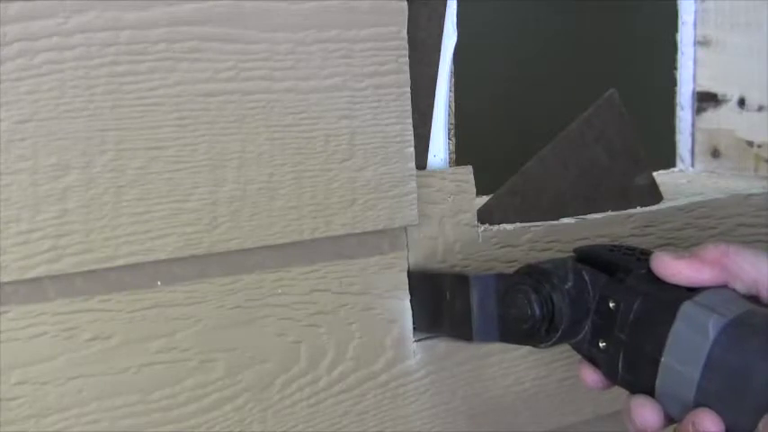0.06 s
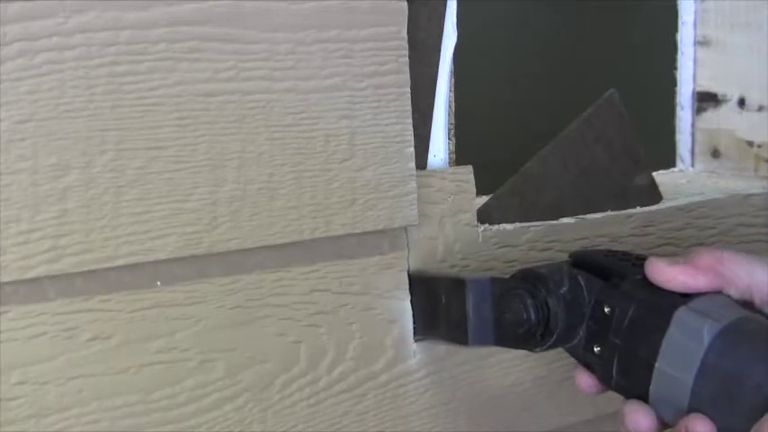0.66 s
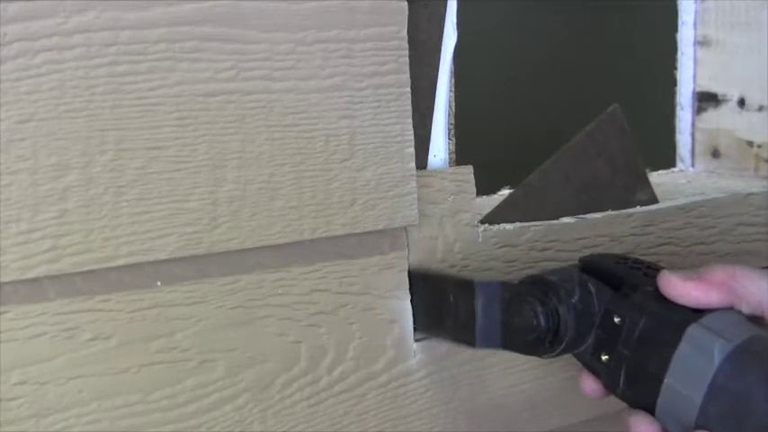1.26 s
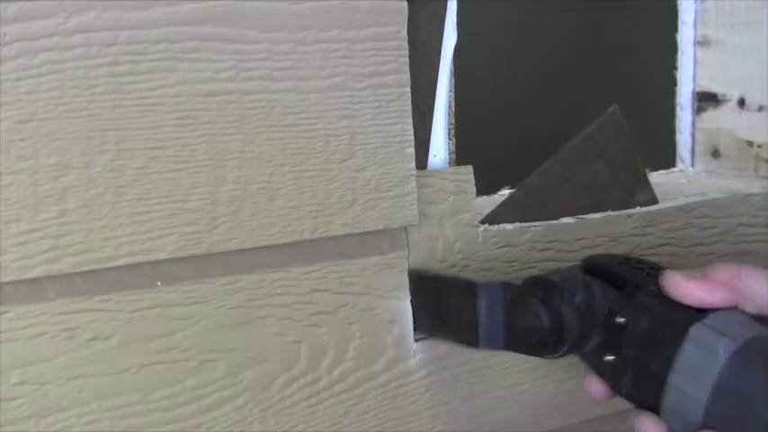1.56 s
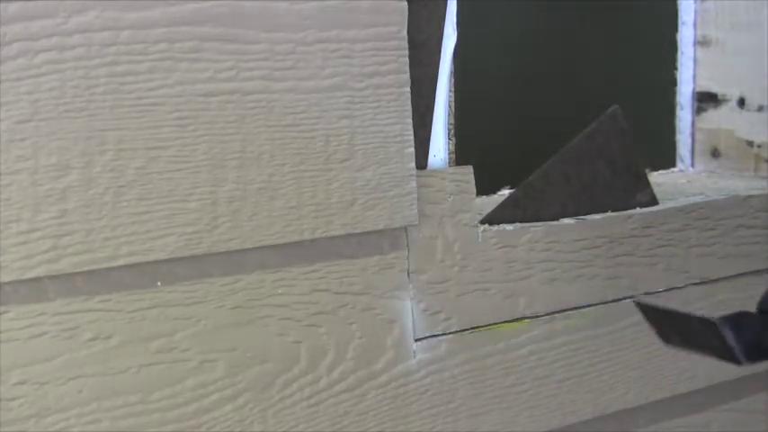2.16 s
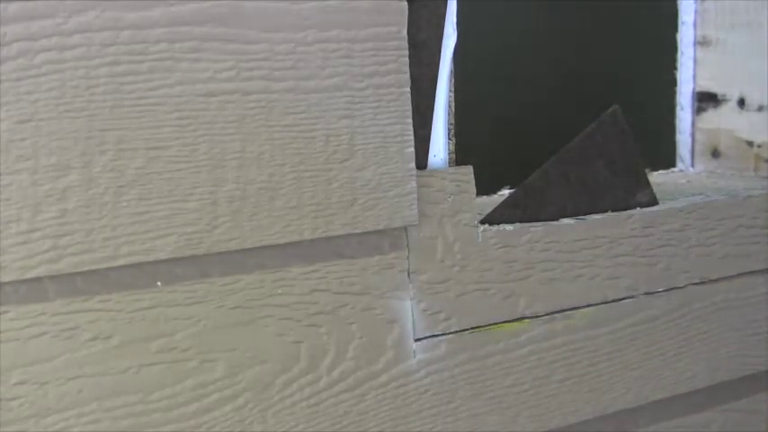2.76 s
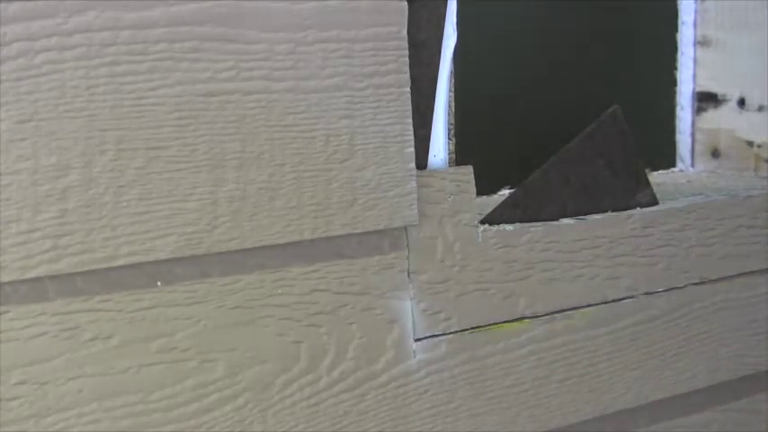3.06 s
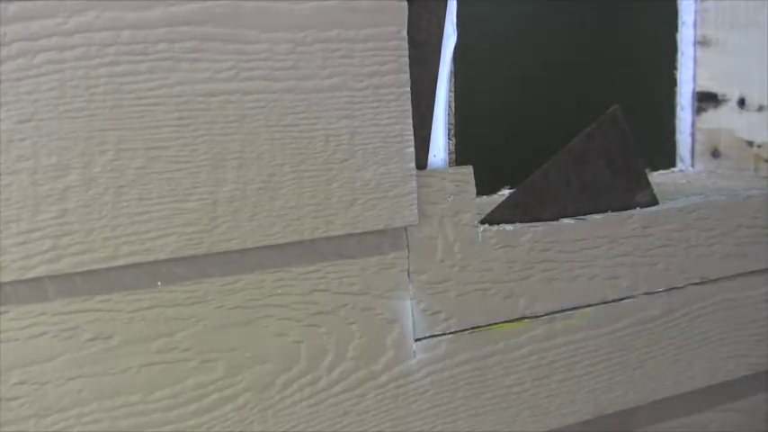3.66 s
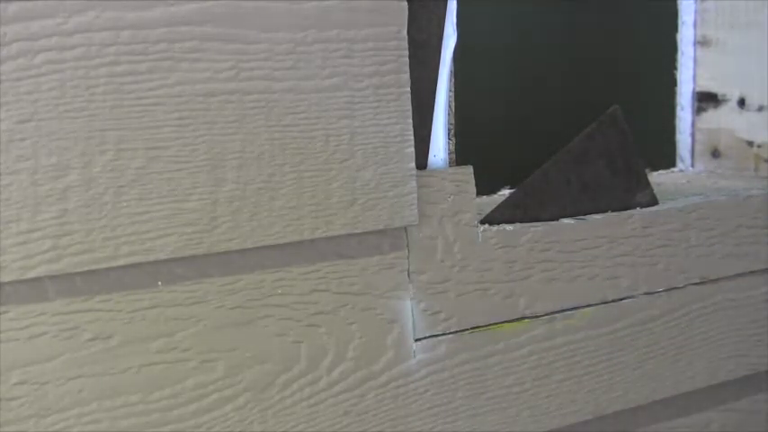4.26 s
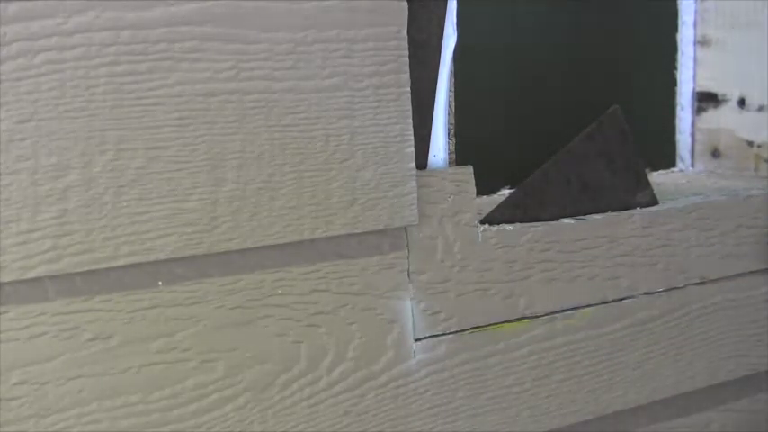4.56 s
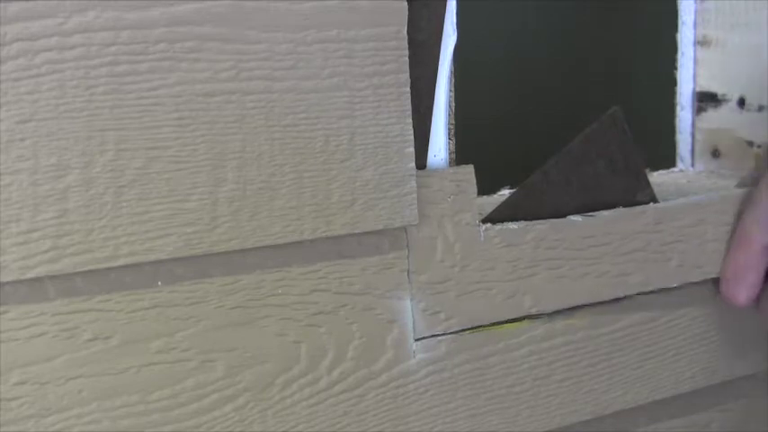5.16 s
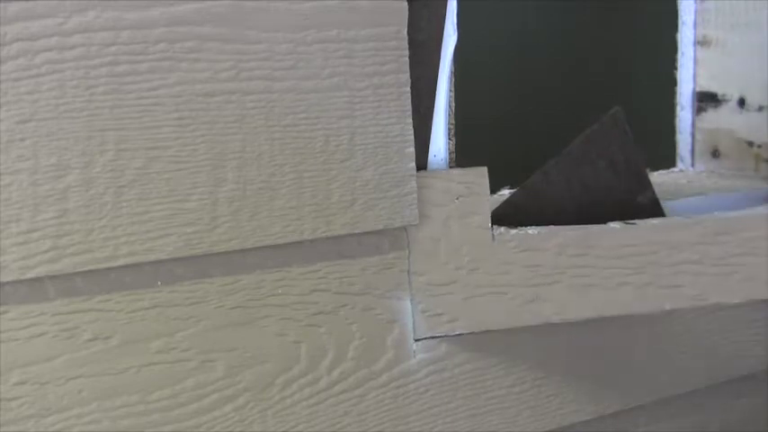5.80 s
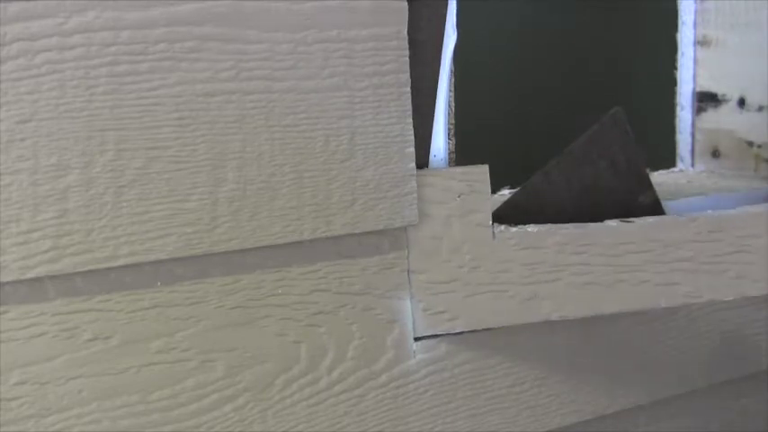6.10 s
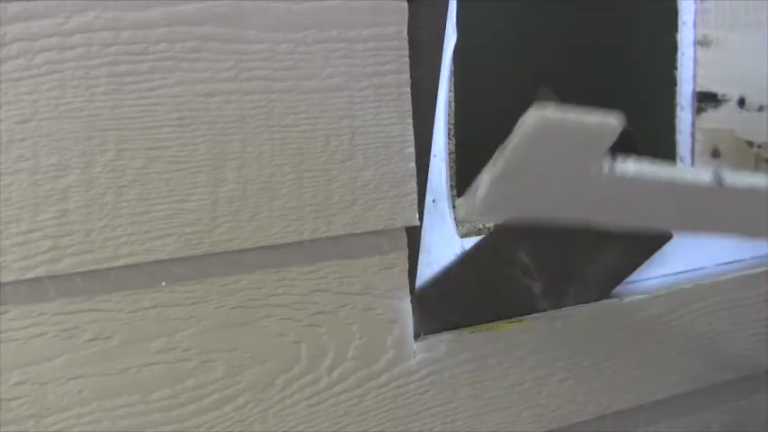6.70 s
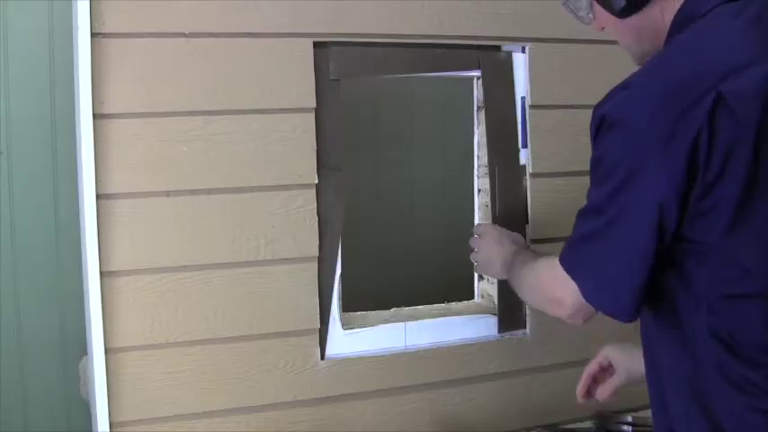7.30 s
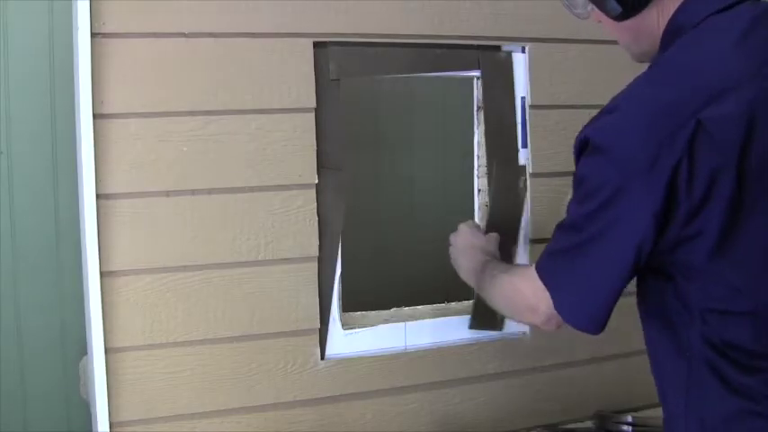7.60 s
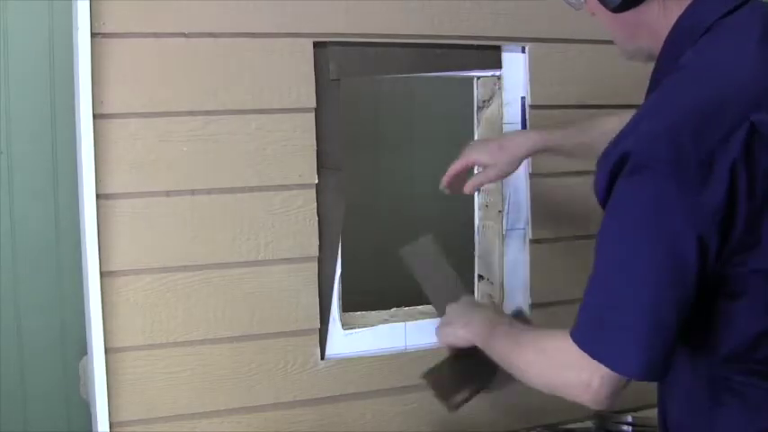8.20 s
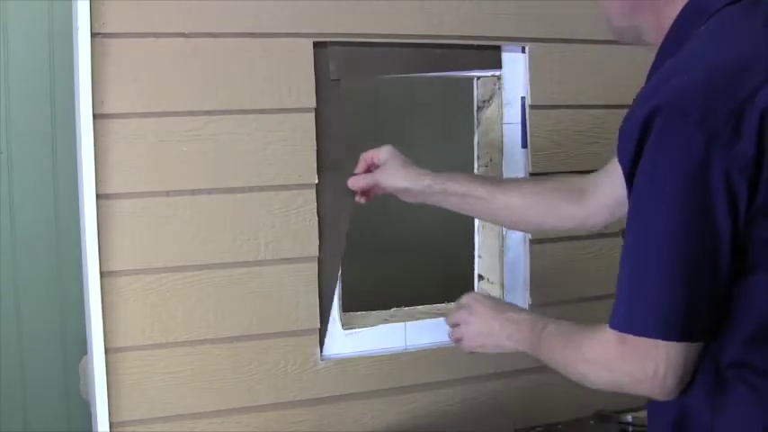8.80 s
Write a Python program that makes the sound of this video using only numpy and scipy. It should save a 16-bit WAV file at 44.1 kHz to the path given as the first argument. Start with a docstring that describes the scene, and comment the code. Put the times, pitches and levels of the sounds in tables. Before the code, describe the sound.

An oscillating power tool buzzes through siding and winds down, then a board knocks and thin metal flashing clangs in a light breeze.

```python
"""An oscillating multi-tool buzzes through house siding, its stroke forcing the board to vibrate; a brief
hiss with one sharp snap sounds in the middle. The blade chatters out of the slot, and the motor runs
free, coasts down through the resonances of its housing and is set aside. In a light breeze the cut board
knocks as it is worked loose, and a thin strip of metal flashing peels off, buckles and clangs.
Nearly everything is on the left."""
import sys
import numpy as np
from scipy import signal
from scipy.fft import rfft, irfft
from scipy.io import wavfile
from scipy.ndimage import uniform_filter1d

SR = 44100
rng = np.random.default_rng(int(sys.argv[2]) if len(sys.argv) > 2 else 0)


def transcribe(u):
    """Save the signal u as a 16-bit wav file named by the first command-line argument.

    u: samples, shape (n,) or (channels, n), limited to [-1, 1]; the rate is SR.
    q: integer samples, one column per channel.
    """
    v = np.clip(np.atleast_2d(u).T, -1, 1)
    q = np.round(v * 32767).astype(np.int16)
    wavfile.write(sys.argv[1], SR, q)


N = 399105
T = np.arange(N) / SR


def undb(db):
    """Decibels to amplitude ratio."""
    return np.exp(np.asarray(db) * np.log(10) / 20)


def unit(x):
    """Normalisation to rms 1."""
    return x / np.sqrt(np.mean(x ** 2) + 1e-20)


def curve(rows):
    """Linear interpolation of (time, value) rows."""
    return np.interp(T, *np.transpose(rows))


def swell(start, length, attack, release):
    """Envelope: a linear rise, a hold until start + length, then 60 dB of decay per release time."""
    return np.clip((T - start) / attack, 0, 1) * undb(-60 * np.clip((T - start - length) / release, 0, 2))


def bell(s, width):
    """Gaussian envelope around time s."""
    return np.exp(-np.minimum(((T - s) / width) ** 2, 20))


def noise():
    """White noise."""
    return rng.standard_normal(N)


def walk(rate):
    """Random modulation: rate values a second, joined by lines."""
    return np.interp(T * rate, np.arange(4096), rng.standard_normal(4096))


def gain_at(points, hz):
    """Magnitude response at hz, interpolated in dB over log frequency."""
    f, db = np.transpose(points)
    return undb(np.interp(np.log(hz), np.log(f), db))


def colour(x, points, size=2048):
    """Minimum-phase filter with the given spectrum."""
    cepstrum = irfft(np.log(gain_at(points, np.arange(size // 2 + 1) * SR / size + 1)))
    cepstrum[1:size // 2] *= 2
    cepstrum[size // 2 + 1:] = 0
    return signal.fftconvolve(x, irfft(np.exp(rfft(cepstrum))))[:len(x)]


def band(x, edges):
    """Band-pass filter."""
    return signal.sosfilt(signal.butter(3, edges, "band", fs=SR, output="sos"), x)


def fade(t60, count):
    """Exponential decay, 60 dB in t60 seconds."""
    return np.exp(-np.log(1000) * T[:count] / max(t60, 1e-3))


def ring(modes, count=16000):
    """Free vibration: a damped sinusoid for each (Hz, dB, t60) mode."""
    return sum(undb(db) * fade(t60, count) * np.sin(2 * np.pi * hz * T[:count]) for hz, db, t60 in modes)


def add(track, s, sound):
    """Superposition of a sound at time s."""
    i = int(s * SR)
    track[i:i + len(sound)] += sound[:N - i]


def background():
    """Noise floor: a low rumble, and a faint hiss that grows."""
    hiss = unit(colour(noise(), [(50, -3.5), (500, 1.5), (3000, -3.0), (15000, -7.0)]))
    growth = np.interp(T, [2, 4, 7, 7.05], [.4, 1.2, 1.3, 2.85])
    return undb(-86.5) * unit(band(noise(), (20, 130))), undb(-89.5) * hiss * growth


# Spectrum of the wind. Each row: frequency in Hz, gain in dB.
WIND_SPECTRUM = [(12, -29), (20, 7.5), (54, -13), (86, -7), (119, -15), (150, -13), (198, -20),
                 (400, -30.5), (520, -43), (880, -120)]
# Low swells of rumble: gusts of wind, and one short dull thump at 3.3 s.
# Each row: peak time in seconds, half-width in seconds, level in dB.
RUMBLE_SWELLS = [(3.04, 0.075, -51), (3.29, 0.13, -46.5), (3.315, 0.019, -39), (4.848, 0.46, -55),
                 (6.559, 0.43, -53.5), (8.05, 0.85, -45)]

def breeze(start_s=2.58, rise_s=0.22, steady_db=-60):
    """Power addition: a steady breeze and low swells, one a short dull thump, make a wavering rumble."""
    steady = undb(steady_db) * np.clip((T - start_s) / rise_s, 0, 1)
    swell_power = sum((undb(db) * bell(s, width)) ** 2 for s, width, db in RUMBLE_SWELLS)
    rumble = unit(band(colour(noise(), WIND_SPECTRUM), (30, 600)))
    return rumble * np.sqrt(steady ** 2 + swell_power) * undb(2.6 * walk(7.5))


# Spectrum of the opening hiss. Each row: frequency in Hz, gain in dB.
HISS_SPECTRUM = [(60, -14), (300, -11), (600, -12.5), (1200, -2), (2500, -6.5), (4000, -14), (7000, -41),
                 (14000, -48)]
# Modes of its snap and bump. Each row: frequency in Hz, relative level in dB, t60 in seconds.
SNAP_MODES = [(263, -10, 0.04), (1236, 0.5, 0.027), (1365, -3.5, 0.033), (1983, 4.5, 0.018),
              (2270, -3, 0.02), (4040, -1.5, 0.0054), (6200, -17.5, 0.051)]
BUMP_MODES = [(174, -2.5, 0.066), (318, -5, 0.016), (1120, 5, 0.0038)]

def hiss_and_snap():
    """Filtered noise and damped modes: a hiss with a snap and a thin tick, ending in a dull bump."""
    out = undb(-53) * unit(colour(noise(), HISS_SPECTRUM)) * np.clip((.48 - T) / 0.0035, 0, 1)
    add(out, .329, undb(-20) * ring(SNAP_MODES))
    add(out, .36, undb(-46.5) * ring([(6290, 4.5, 0.037), (9200, -4.5, 0.11)]))
    add(out, .448, undb(-29) * ring(BUMP_MODES))
    return band(out, (165, 15000))


# Low, middle and high bands of an impact. Each row: lower and upper edge in Hz.
IMPACT_BANDS = [(80, 500), (500, 2500), (2500, 14000)]

def knocks(rows, body, t60s, tail_db, tail_t60, gain_db, attack_s=0.00089, count=16000):
    """Frequency-dependent damping: noise bursts whose lows last longest, with a faint echo off the wall."""
    out = np.zeros(N)
    onset = np.minimum(T[:count] / attack_s, 1)
    echo = undb(tail_db) * fade(tail_t60, count)
    for s, middle_db, low_db, high_db in rows:
        for edges, db, t60, trim_db in zip(IMPACT_BANDS, (low_db, middle_db, high_db), t60s, gain_db):
            burst = rng.standard_normal(count) * (fade(t60, count) + echo) * onset
            sound = band(colour(burst, body), edges)
            add(out, s, undb(db + trim_db) * sound / sound[:880].std())  # level set by the first 20 ms
    return out


# The tool lands. Each row: start in seconds, then middle, low and high relative levels in dB.
LANDINGS = [(3.798, -40.5, -60, -78), (3.85, -42, -59, -82), (3.9, -46.5, -71, -77), (3.963, -37, -52, -58),
            (4.01, -39.5, -49, -59)]
# Modes of the metal it lands on. Each row: frequency in Hz, relative level in dB, t60 in seconds.
METAL_MODES = [(1125, -13, 0.39), (3020, -11, 0.29), (4070, -18, 0.27), (5250, -11, 0.27),
               (6708, -14, 0.23), (8500, -15, 0.28), (10000, -16, 0.2), (11570, -16, 0.16)]
# Response of the support. Each row: frequency in Hz, gain in dB.
SUPPORT_SPECTRUM = [(35, -41), (60, 8), (115, 2), (141, -5), (257, -6), (302, -15), (564, -31.5),
                    (780, -25), (1630, -28.5), (1960, -38), (2980, -27.5), (3420, -27.5), (5180, -22.5),
                    (15000, -41)]

def setting_down():
    """Impact excitation: the harder the tool's tick, the more the metal rings and its support booms."""
    out = knocks(LANDINGS, SUPPORT_SPECTRUM, t60s=(.2, .04, .025), tail_db=-10, tail_t60=0.37,
                 gain_db=(2, -4, 6), attack_s=0.0007)
    boom = ring([(103.9, 15.4, 0.88), (155, 10.7, 0.66)])
    for s, _, _, high_db in LANDINGS:
        add(out, s, undb(high_db) * (undb(15) * ring(METAL_MODES) + boom))
    return out


# Knocks of the board. Each row: start in seconds, then middle, low and high relative levels in dB.
BOARD_IMPACTS = [(4.892, -53, -44.5, -79), (4.928, -52, -47, -62), (5.011, -60, -58.5, -63.5),
                 (5.402, -53.5, -68.5, -62), (6.116, -55.5, -62, -62.5), (6.163, -75, -79, -69),
                 (6.298, -58.5, -66, -71), (6.513, -34.5, -44, -56), (6.594, -32, -64, -47),
                 (6.605, -38, -50, -52)]
# Response of the board. Each row: frequency in Hz, gain in dB.
BOARD_SPECTRUM = [(47, -13), (80, -1.5), (135, -21), (562, -9), (833, -14), (909, -5.5), (1110, -9.5),
                  (1640, -20.5), (2090, -35), (2550, -37.5), (4210, -52), (6670, -52.5), (15000, -69)]

def loosening_board():
    """Damped impacts: the cut board knocks dully as it is worked loose."""
    return knocks(BOARD_IMPACTS, BOARD_SPECTRUM, t60s=(.16, .05, .03), tail_db=-16, tail_t60=0.14,
                  gain_db=(4, -4, 5))


# Slides. Each row: start and length in seconds, then low, middle and high levels in dB.
SLIDING = [(4.581, 0.52, -70.5, -76, -82.5), (4.834, 0.041, -51, -64, -67), (5.159, 0.26, -66, -69, -79),
           (5.892, 0.1, -70.5, -77.5, -78.5), (6.062, 0.42, -68.5, -75, -77.5),
           (6.561, 0.16, -48.5, -60, -80), (7.036, 0.88, -61.5, -67.5, -71), (7.636, 0.14, -51, -57, -57.5),
           (7.886, 0.45, -58, -66, -76), (8.292, 0.045, -37.5, -71, -73), (8.448, 0.58, -52.5, -46, -64)]
# Spectrum of the rustle and of the strip's slaps. Each row: frequency in Hz, gain in dB.
STRIP_SPECTRUM = [(47, -72), (80, -3), (142, -2), (287, -8), (374, -0.5), (509, -4.5), (884, -5),
                  (1310, -2.5), (1640, -4.5), (2660, -12.5), (3620, -13.5), (6420, -18.5), (7830, -19.5),
                  (8740, -22), (15500, -34.5)]

def rustle(grain_db=1.5, fumble_s=3.9, fumble_db=(-74.5, -80.5, -83.5)):
    """Sliding friction: board, strip and sleeves shed dense grains, with light fumbling between slides."""
    attack_s, release_s = 0.042, 0.39
    slides = [swell(s, length, attack_s, release_s) for s, length, *_ in SLIDING]
    fumbling = np.clip((T - fumble_s) / attack_s, 0, 1)
    bands_hz = [(200, 800), (800, 3000), (3000, 14000)]
    out = 0
    for edges, levels_db, floor_db in zip(bands_hz, np.transpose(SLIDING)[2:], fumble_db):
        power = sum((undb(db) * slide) ** 2 for db, slide in zip(levels_db, slides))
        power += (undb(floor_db) * fumbling) ** 2
        grains = colour(noise() * undb(grain_db * walk(400)), STRIP_SPECTRUM)
        out += unit(band(grains, edges)) * np.sqrt(power) * undb(2.2 * walk(25))
    return out


# Spectrum of tearing wood fibres. Each row: frequency in Hz, gain in dB.
FIBRE_SPECTRUM = [(240, -37), (400, 3), (503, 13.5), (1020, -62), (1450, -15), (2630, -28), (5310, -13),
                  (15500, -21)]

def peeling(grain_db=4.5, level_db=-41):
    """Fracture: wood fibres let go of the strip in a quick, rising fizz."""
    fibres = unit(colour(noise() * undb(grain_db * walk(400)), FIBRE_SPECTRUM))
    return fibres * undb(level_db) * swell(start=7.67, length=0.12, attack=0.14, release=0.16)


# Slaps of the strip. Each row: start in seconds, middle, low and high relative levels in dB,
# clang pitch in Hz, relative clang level in dB.
BUCKLES = [(7.674, -53, -48, -66, 450, -61), (7.809, -47, -58, -61, 1320, -46.5),
           (7.987, -39, -54, -53.5, 1370, -59), (8.004, -42.5, -76, -60, 1320, -58),
           (8.034, -38.5, -38, -49.5, 450, -33), (8.064, -36.5, -42.5, -57.5, 1350, -51),
           (8.189, -42.5, -42, -62.5, 1780, -66), (8.2, -29, -39.5, -74, 1950, -62),
           (8.257, -45.5, -39.5, -69, 408, -56), (8.318, -33, -36.5, -68.5, 377, -34.5),
           (8.428, -28.5, -46.5, -48.5, 1333, -33), (8.434, -49, -65, -48.5, 1600, -32),
           (8.499, -34, -50, -49.5, 1430, -49), (8.553, -35, -48, -53, 1782, -39),
           (8.579, -31, -56, -57, 453, -33.5), (8.603, -32, -72, -41.5, 1040, -49),
           (8.662, -38, -48.5, -60, 1287, -35.5), (8.703, -39.5, -47, -65, 1040, -49),
           (8.758, -31, -50, -58, 1640, -33), (8.791, -38, -35.5, -66, 432, -35),
           (8.81, -35.5, -43, -66, 1040, -53), (8.882, -34.5, -66, -48, 1633, -25),
           (8.902, -36.5, -60, -56, 1640, -41), (8.93, -46, -68, -51, 1780, -36.5),
           (8.975, -40, -54, -43.5, 1780, -32), (8.997, -34, -56, -43, 1280, -29)]
# Modes of a clang. Each row: multiple of the pitch, relative level in dB, t60 in seconds at CLANG_HZ.
CLANG_MODES = [(1, 1, 0.11), (1.029, -6, 0.12), (2.015, -13.5, 0.1)]
CLANG_HZ = 1300

def strip_slaps():
    """Buckling: each slap cracks and clangs at a pitch set by the bend; low clangs ring longer."""
    out = knocks([row[:4] for row in BUCKLES], STRIP_SPECTRUM, t60s=(.1, .045, .04), tail_db=-17.5,
                 tail_t60=0.37, gain_db=(4, -3.5, 6))
    for s, *_, clang_hz, clang_db in BUCKLES:
        linger = np.sqrt(CLANG_HZ / clang_hz)
        add(out, s, undb(clang_db) * ring([(k * clang_hz, db, t60 * linger) for k, db, t60 in CLANG_MODES]))
    return out


# Modes of the hanging strip. Each row: frequency in Hz, relative level in dB, t60 in seconds.
FREE_STRIP_MODES = [(445, -8, 0.22), (733, -4.5, 0.2), (1040, -19, 0.15), (1295, -16, 0.23),
                    (1363, 6.5, 0.13), (1540, -11, 0.14), (1780, -1, 0.14), (3720, 11, 0.081),
                    (3900, 10, 0.11), (5400, 20.5, 0.027), (6430, 20, 0.033)]

def strip_ringing(handling, free_s=8.42):
    """Resonance: once the strip hangs free, handling excites its modes."""
    return undb(-53.5) * signal.fftconvolve(handling * (T > free_s), ring(FREE_STRIP_MODES))[:N]


TONE_SAMPLES = 180000  # the tool's harmonics last until it has stopped

def harmonics(turns, gains, flutter_db, flutter_rate):
    """Additive synthesis: multiples of the stroke rate, each wavering on its own; rms 1 before flutter."""
    out, power, live = np.zeros(N), 1e-12, slice(TONE_SAMPLES)
    for k, gain in gains:
        levels = undb(flutter_db * rng.standard_normal(1024))
        waver = np.interp(T[live] * flutter_rate, np.arange(1024), levels)
        out[live] += gain * waver * np.sin(2 * np.pi * (k * turns[live] + rng.random()))
        power = power + gain ** 2 / 2
    out[live] /= np.sqrt(power)
    return out


def clicks(turns, scatter_db):
    """Impulse train: one click a stroke, each with its own strength."""
    stroke = turns.astype(int)
    strength = undb(scatter_db * rng.standard_normal(4096))[stroke]
    steps = stroke + np.clip((turns - stroke) / np.gradient(turns), 0, 1)
    return strength * np.diff(steps, prepend=0)


def dispersed(x, delay_s):
    """Dispersion of bending waves: highs arrive first, 1 kHz after delay_s, so a click becomes a chirp."""
    hz = np.arange(513) * SR / 1024
    return signal.fftconvolve(x, irfft(np.exp(-4j * np.pi * delay_s * np.sqrt(1000 * hz))))[:N]


def gear_ticks(turns):
    """Backlash: the gear knocks at both ends of the stroke, harder at one; rms 1 at every speed."""
    uneven = turns + .012 * walk(40) + 1
    ticks = clicks(uneven, scatter_db=3.5) - .6 * clicks(uneven + .5, scatter_db=3.5)
    return ticks / np.sqrt(uniform_filter1d(ticks ** 2, size=8800) + 1e-9)


# Resonances of the tool's body. Each row: stroke rate in Hz, half-width in Hz, buzz level in dB,
# rattle frequency in Hz, rattle level in dB.
BODY_RESONANCES = [(192.3, 33, -56.5, 780, -50), (129.7, 7, -72, 3650, -57)]

def shudder(hz, turns):
    """Critical speeds: the body buzzes and its shell rattles as the stroke rate passes each resonance."""
    buzz = np.sin(2 * np.pi * turns) + undb(-2) * np.sin(2 * np.pi * 3 * turns)
    out = 0
    for centre_hz, width_hz, buzz_db, rattle_hz, rattle_db in BODY_RESONANCES:
        response = 1 / (1 + ((hz - centre_hz) / width_hz) ** 4)
        rattle = unit(band(gear_ticks(turns) + .7 * noise(), (rattle_hz - 380, rattle_hz + 380)))
        out += undb(buzz_db) * response ** 2 * buzz + undb(rattle_db) * response * rattle
    return out


def whine(hz, turns, multiple=20, resonance_hz=6612, width_hz=33):
    """Swept resonance: the commutator's tone swells at a sharp peak; a faint octave rides above it."""
    response = 1 / np.hypot(1, 2 * (multiple * hz - resonance_hz) / width_hz)
    speed, phase = hz / hz.max(), 2 * np.pi * multiple * turns
    tone = (undb(0.5) * response + undb(-9.5) * speed ** 4) * np.sin(phase)
    octave = undb(-27) * speed ** 10 * np.sin(2 * phase)
    return undb(walk(23.54)) * (tone + octave)


# Response of the housing. Each row: frequency in Hz, gain in dB.
HOUSING_SPECTRUM = [(200, -30), (450, -22), (700, -21.5), (900, -11), (1100, -5.5), (1350, -11),
                    (1650, -5.5), (1950, -2), (2250, -2), (2500, -10.5), (3000, -12.5), (3500, -4),
                    (3900, -5.5), (4300, -9), (4800, -11), (5600, -9), (6500, -14), (7300, -19.5),
                    (8500, -12), (9500, -20), (13000, -36)]
# Drive harmonics, from the first up. Each row: relative level in dB with the gear tight, then slack.
DRIVE_HARMONICS = [(16.5, 24), (17, 2), (0.5, 8.5), (1.5, -3), (4, -2.5), (5, -7), (8.5, 7), (4.5, -22),
                   (8.5, 9), (0, 0), (10, 3.5), (5, 1.5), (10, 2), (4, -29), (8, 1.5), (-7, -2), (2, -3.5),
                   (-1, -12), (1, 1), (13, -18), (-14, 1), (13, -25), (-3, -11), (-16, -1), (0, 3.5),
                   (2, -28), (7, -14), (-3, -3), (-3, -18), (-7, -17), (-17, -1), (-3, -21), (-7, -17),
                   (-8, -7), (-7, -15), (-27, 6), (0, -9), (-2, -7), (-4, -2), (5, -7)]
# Interference close to the wall. Each row: harmonic number, gain in dB.
WALL_INTERFERENCE = [(3, 5.5), (5, 7), (6, -19), (7, -6), (13, 4), (20, -10)]

def drive_tones(hz, turns, slowed, away_s=1.956, swing_s=0.28):
    """Source and filter: drive and bearing tones slide through the fixed resonances of the housing."""
    live = slice(TONE_SAMPLES)
    near_wall = np.clip((away_s - T[live]) / swing_s, 0, 1)
    wall_db = {round(k): db for k, db in WALL_INTERFERENCE}
    slack = np.clip(slowed[live] / 0.7, 0, 1)  # fully open once 70% of the speed is lost
    gains = []
    for k, (tight_db, slack_db) in enumerate(DRIVE_HARMONICS, 1):
        db = tight_db + slack * (slack_db - tight_db) + near_wall * wall_db.get(k, 0)
        gains.append((k, undb(db) * gain_at(HOUSING_SPECTRUM, k * hz[live])))
    drive = undb(4.5) * harmonics(turns, gains, flutter_db=3.6, flutter_rate=14)
    # the balls of the bearings add weak tones between the harmonics
    multiples = np.arange(2, 36) + rng.uniform(.25, .75, 34)
    balls = [(k, gain_at(HOUSING_SPECTRUM, k * hz[live])) for k in multiples]
    return drive + undb(-19) * harmonics(turns, balls, flutter_db=6, flutter_rate=21)


# Spectrum of cooling air and dust. Each row: frequency in Hz, gain in dB.
AIR_SPECTRUM = [(120, -58), (200, -27), (653, -1), (1510, -15.5), (1620, -6.5), (1840, -12), (2250, -0.5),
                (6830, -5), (15500, -32)]
# Housing bands rung by the gear. Each row: lower and upper edge in Hz, relative level in dB.
GEAR_RATTLE_BANDS = [(1600, 2420, 17.5), (4180, 5800, 9)]

def free_running(hz, turns, throb):
    """Machine noise: tones, brushes and fan, with gear rattle taking over as it slows; rms 1 throughout."""
    slowed = 1 - hz / hz.max()
    tones = drive_tones(hz, turns, slowed)
    brushes = undb(-5.5) * unit(colour(noise(), HOUSING_SPECTRUM))
    air = undb(-7) * unit(colour(noise(), AIR_SPECTRUM)) * (1 - slowed) ** 3
    air += undb(-28) * unit(band(noise(), (6500, 15000)))
    ticks = gear_ticks(turns)
    rattle = sum(undb(db) * unit(band(ticks, (lo, hi))) for lo, hi, db in GEAR_RATTLE_BANDS) * slowed ** 6
    softened_throb = throb + (1 - throb) * slowed / 2
    sound = tones + dispersed(rattle, delay_s=0.01) + (brushes + air) * softened_throb
    return sound / np.sqrt(uniform_filter1d(sound ** 2, size=4400) + 1e-9)


# Motor speed under power, sagging with the load. Each row: time in seconds, stroke rate in Hz.
POWERED_SPEED = [(0.0, 324.7), (0.53, 315.6), (0.75, 310.3), (0.92, 309.1), (1.06, 314.1), (1.26, 310.6),
                 (1.41, 318.9), (1.57, 323.1), (1.6, 318.4), (1.82, 327.6), (1.98, 329.9), (2.26, 331.2)]

def stroke_rate(off_s=2.272, friction_hz_per_s=123.4, drag_hz=270):
    """Coast-down: dry friction and quadratic fan drag, equal at drag_hz, brake the motor after off_s."""
    braking = friction_hz_per_s * np.maximum(T - off_s, 0) / drag_hz
    angle = np.arctan(curve(POWERED_SPEED) / drag_hz) - braking
    return np.maximum(drag_hz * np.tan(np.maximum(angle, 0)), 10)


# Level of the cut, following the push on the blade. Each row: time in seconds, level in dB.
CUT_LEVEL = [(0, -39.5), (0.35, -38.5), (0.55, -37), (0.77, -38), (0.85, -40), (0.95, -38.5), (1.0, -41.5),
             (1.065, -40), (1.09, -39.5), (1.11, -49), (1.65, -68), (1.8, -77)]
# The blade catches. Each row: start and length in seconds, level in dB, share of chatter from 0 to 1.
BLADE_CATCHES = [(0.787, 0.037, -45, 0.9), (0.809, 0.027, -41.5, 0.7), (0.858, 0.033, -44, 0.7),
                 (1.04, 0.054, -45, 0.24), (1.159, 0.0074, -41.5, 0.85), (1.187, 0.03, -46.5, 0.8),
                 (1.219, 0.023, -38.5, 0.2), (1.262, 0.034, -43.5, 0), (1.421, 0.0069, -35.5, 0.5),
                 (1.446, 0.054, -39.5, 0.3), (1.562, 0.03, -41, 0.66), (1.645, 0.0046, -45, 0.85)]

def blade_contact(ease_s=1.02, out_s=1.9, release_s=0.13, resting_db=-52.5):
    """Intermittent contact: the push (0-1), and the gains of clean cutting and of loose chatter."""
    push = swell(start=-0.964, length=1 + ease_s, attack=0.97, release=0.073)
    in_slot = swell(start=-1, length=1 + out_s, attack=1, release=release_s)
    clean_power = undb(curve(CUT_LEVEL)) ** 2
    loose_power = (in_slot * (1 - push) * undb(resting_db)) ** 2
    for s, length, db, share in BLADE_CATCHES:
        attack_s = 0.0015 + 0.036 * (1 - share) ** 2  # chatter starts at once, clean cutting builds up
        power = (undb(db) * swell(s, length, attack_s, release_s)) ** 2
        clean_power += (1 - share) * power
        loose_power += share * power
    return push, np.sqrt(clean_power), np.sqrt(loose_power)


# Response of the board rattled by the blade. Each row: frequency in Hz, gain in dB.
CHATTER_SPECTRUM = [(150, -20.5), (300, -1.5), (620, -0.5), (978, 3.5), (1200, -8.5), (1890, 2),
                    (3060, 1.5), (3890, -2.5), (4470, -4), (6540, -10), (8180, -14.5), (15500, -31)]

def chatter(turns, throb):
    """Repeated impact: the loose blade slaps the board once a stroke, unevenly, with a gritty tail."""
    grit = undb(-26.5) * unit(band(noise(), (9000, 15500))) * throb
    flicker = undb(2.5 * walk(70))
    slaps = clicks(turns + .006 * walk(300) + 1, scatter_db=2.5)
    tails = noise() * np.exp(-(turns % 1) / .4)
    force = slaps / slaps[:SR].std() + .22 * tails / tails[:SR].std()
    rattle = colour(dispersed(force, delay_s=.003), CHATTER_SPECTRUM)
    return flicker * (rattle / rattle[:SR].std() + grit)


# Stroke harmonics, from the first up. Each row: relative level in dB at the surface, then deep in the slot.
CUT_HARMONICS = [(-6.5, -7), (-6.5, -13), (-12.5, -8.5), (-19, -11.5), (-12.5, -11.5), (-1.5, -1), (-3, 0),
                 (-8, -3.5), (-6.5, -9.5), (-21, -10.5), (-8, -8), (-11.5, -2), (-13.5, -23),
                 (-20.5, -19.5), (-9, -13), (-19.5, -12.5), (-18, -10.5), (-13, -16.5), (-25.5, -17.5),
                 (-21.5, -23), (-30, -27.5), (-27, -28), (-20, -27), (-25, -29.5), (-23.5, -19.5),
                 (-23.5, -27.5), (-18, -23), (-35, -24.5), (-28.5, -18), (-23.5, -31)]

def cutting(turns, throb, sink_s=0.32, sink_length_s=0.18):
    """Forced vibration: the stroke drives the board as the blade sinks in; teeth sizzle and dust hisses."""
    # the fundamental hums at the bottom of the cut
    hum = undb(11 * bell(0.856, width=0.12) - 3)[:TONE_SAMPLES]
    depth = np.clip((T - sink_s) / sink_length_s, 0, 1)
    board = 0
    for share, levels_db in zip((1 - depth, depth), np.transpose(CUT_HARMONICS)):
        gains = [(k, gain * hum if k == 1 else gain) for k, gain in enumerate(undb(levels_db), 1)]
        board += np.sqrt(share) * harmonics(turns, gains, flutter_db=2.5, flutter_rate=14)
    # the thin steel sings with the highest harmonics, which come and go
    steel_spectrum = [(9500, -2), (10200, -0.5), (10800, -5.5), (12500, -7.5), (15500, -15)]
    start_hz = POWERED_SPEED[0][1]
    steel = [(k, gain_at(steel_spectrum, k * start_hz)) for k in range(len(CUT_HARMONICS) + 1, 50)]
    teeth = undb(-28.5) * harmonics(turns, steel, flutter_db=6.5, flutter_rate=3.9)
    dust = undb(-19) * unit(colour(noise(), AIR_SPECTRUM)) * throb
    return board + teeth + dust


# The free tool swings past the listener and is lowered. Each row: time in seconds, relative level in dB.
MOTOR_LEVEL = [(1.6, -53), (1.72, -54), (1.99, -44), (2.16, -44.5), (2.47, -47), (2.5, -44), (2.74, -47),
               (3.28, -45), (3.34, -50), (3.77, -51)]

def multi_tool(fade_hz=60.8, stall_hz=28.5):
    """Mechanical coupling: the stroke drives the board while cutting, and only the housing once free."""
    hz = stroke_rate()
    push, clean, loose = blade_contact()
    # the speed stumbles when the blade catches, and more and more as the motor runs out
    stumble = .005 * loose / loose.max() + .006 * (1 - hz / hz.max()) ** 2
    jitter = .0005 * walk(60) + stumble * walk(150)
    turns = np.cumsum(hz * (1 + jitter)) / SR  # phase in strokes
    throb = 1 + .8 * np.cos(2 * np.pi * turns)
    spinning = np.clip((hz - stall_hz) / (fade_hz - stall_hz), 0, 1)
    motor = undb(2.5) * free_running(hz, turns, throb) + whine(hz, turns)
    motor *= (1 - push) * spinning * undb(curve(MOTOR_LEVEL))
    cut = clean * cutting(turns, throb)
    skipping = loose * chatter(turns, throb)
    rasp = undb(3 * loose / (loose + clean) * walk(220))  # a looser blade bites more unevenly
    return cut * rasp + skipping + motor + shudder(hz, turns)


def scene():
    """Level panning: work, wind and rumble on the left, faint hiss on the right, the snap in the middle."""
    board = loosening_board()
    handling = strip_slaps() + rustle()
    wind = breeze()
    work = multi_tool() + setting_down() + board + handling + strip_ringing(handling) + peeling()
    rumble, faint_hiss = background()
    left = work + wind + rumble
    right = undb(-54.5) * work + undb(-28) * wind + faint_hiss
    return np.array([left, right]) + hiss_and_snap()


def record(dry):
    """Band limiting: a steep low-pass removes the highest treble."""
    top_hz = 15900
    return signal.sosfilt(signal.ellip(8, .2, 70, top_hz, fs=SR, output="sos"), dry)


dry = scene()
out = record(dry)
transcribe(out)
```